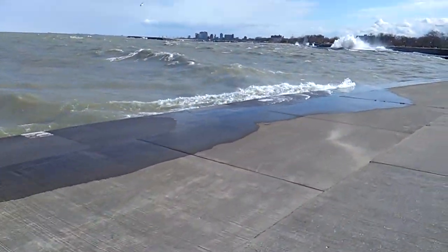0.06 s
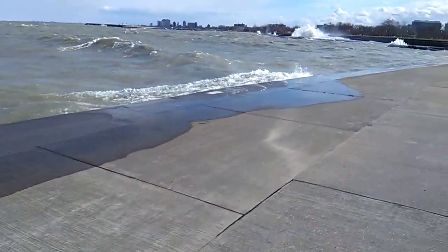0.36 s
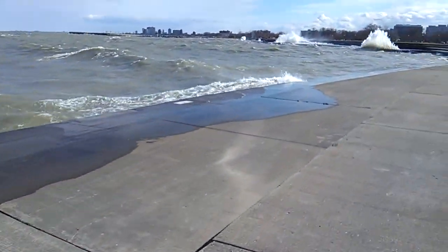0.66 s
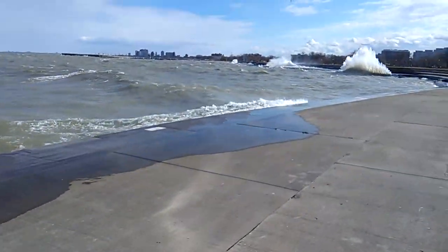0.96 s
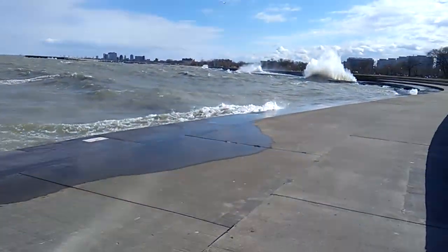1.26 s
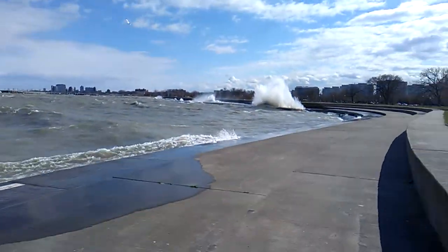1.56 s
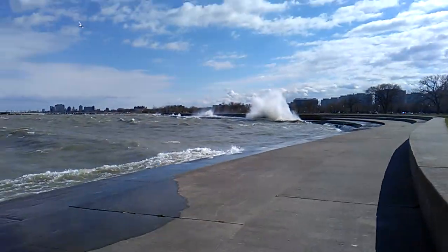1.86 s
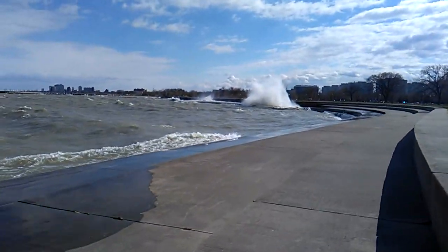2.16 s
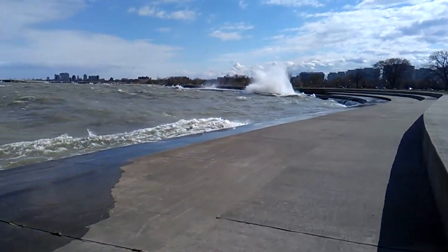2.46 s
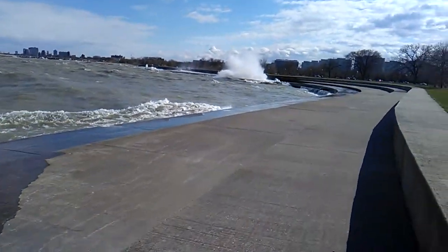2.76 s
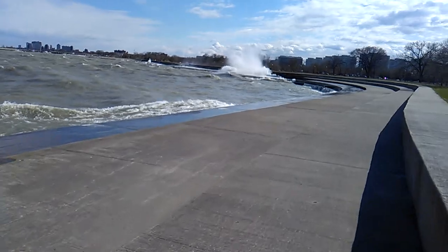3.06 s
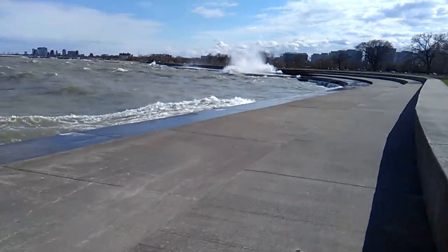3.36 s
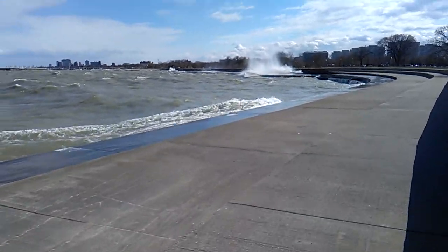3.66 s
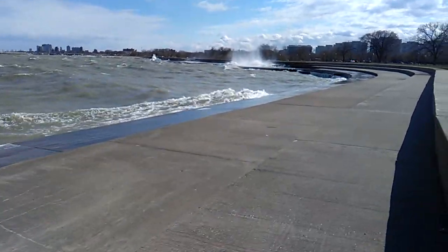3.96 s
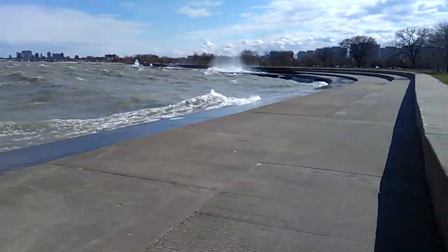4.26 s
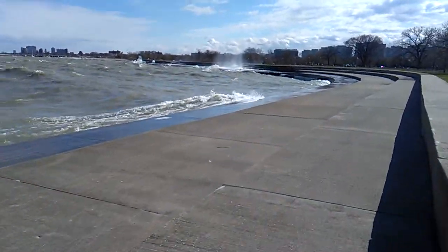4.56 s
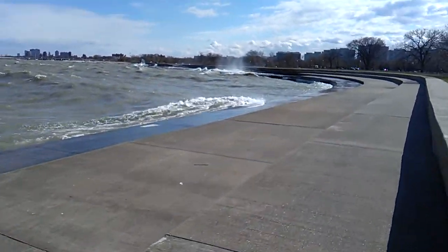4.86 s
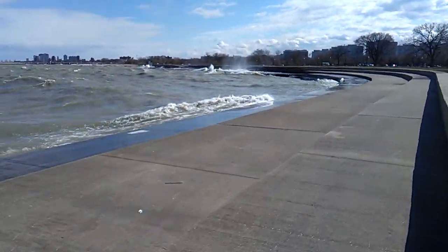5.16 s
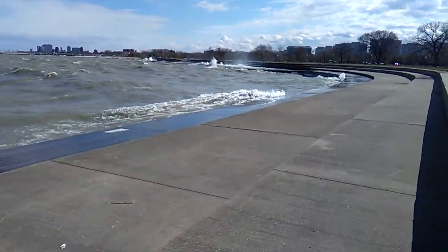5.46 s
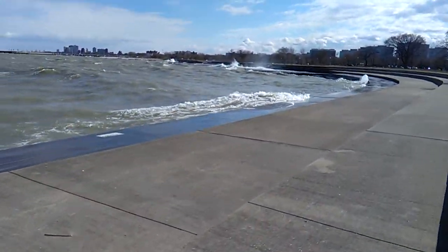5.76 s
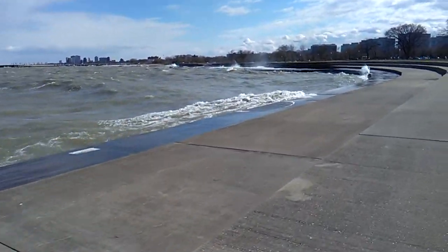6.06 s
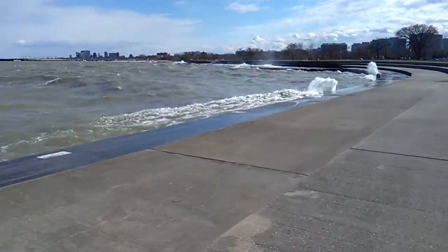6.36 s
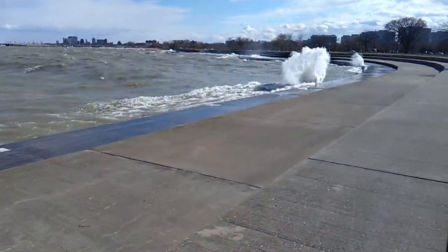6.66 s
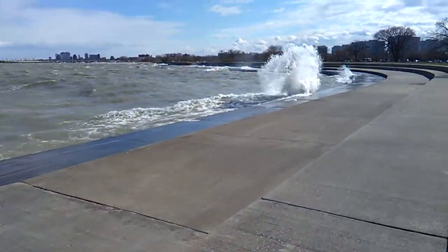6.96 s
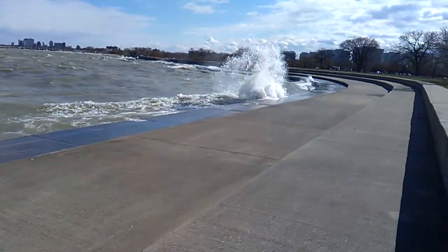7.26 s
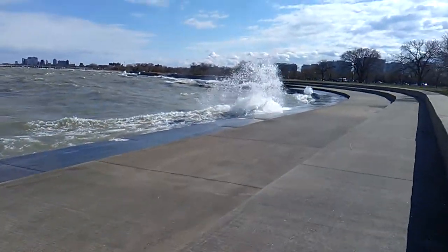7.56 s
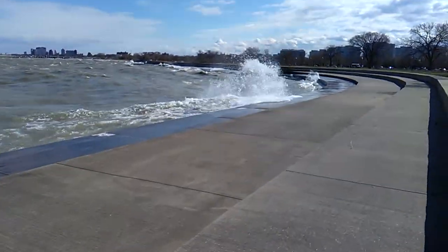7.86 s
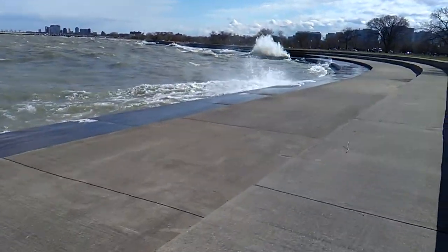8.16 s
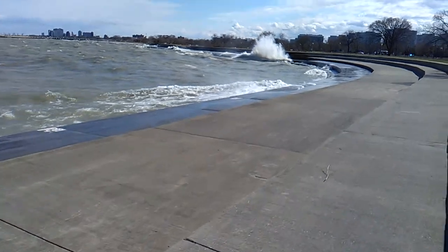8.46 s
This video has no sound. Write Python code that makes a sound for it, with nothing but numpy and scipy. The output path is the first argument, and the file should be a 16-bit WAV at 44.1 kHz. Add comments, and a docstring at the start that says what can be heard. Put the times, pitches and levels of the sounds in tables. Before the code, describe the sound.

Gusty wind buffets a hand-held microphone throughout, a low, fluttering rumble that jumps between left and right and is the loudest sound. Behind it, choppy waves roar steadily on a concrete lakeshore, sloshing and slapping down with a fine hiss. Shoes scuff and clink lightly on grit at an uneven walking pace.

The wind hits hard in the first second, eases until about 2 seconds, then builds again. A wave splashes with a brief patter of drops at 2.5 seconds. The strongest gusts come from about 3.7 to 5.3 seconds, with a few sharp pops and another splash near 4.7. From 5 seconds a big wave rolls in, bursting on the wall with a hollow thump at about 6.9. Its spray hisses and rains down in heavy drops around 8 seconds, as gusts continue to the end at about 8.6.

```python
"""Gusty wind buffets a hand-held phone, its eddies rumbling over each of two microphone ports.
Behind it, on a walk along a concrete lakeshore, choppy waves roar with clouds of bubbles, slosh up the
steps and slap down in a hiss of spray. Shoes scuff and clink on the grit. Near the end a big wave bursts
on the wall with a hollow thump of trapped air, and its spray rains down in heavy drops."""
import sys
import numpy as np
from scipy import signal
from scipy.fft import rfft, irfft, next_fast_len
from scipy.io import wavfile
from scipy.ndimage import uniform_filter1d, map_coordinates

SR = 44100
rng = np.random.default_rng(int(sys.argv[2]) if len(sys.argv) > 2 else 0)


def transcribe(u):
    """Save the signal u as a 16-bit wav file named by the first command-line argument.

    u: samples, shape (n,) or (channels, n), limited to [-1, 1]; the rate is SR.
    q: integer samples, one column per channel.
    """
    v = np.clip(np.atleast_2d(u).T, -1, 1)
    q = np.round(v * 32767).astype(np.int16)
    wavfile.write(sys.argv[1], SR, q)


N = 380141
T = np.arange(N) / SR
FFT_SIZE = next_fast_len(N + 8192)
FREQS = np.maximum(np.fft.rfftfreq(FFT_SIZE, 1 / SR), 1)

# Pan is left minus right throughout. Tone curves, all (frequency [Hz], relative level [dB]):
ROAR_EQ = [(40, 16), (150, 13.5), (300, 8.5), (470, 1.5), (610, 5), (760, 1.5), (960, 2.5), (1150, -6.5),
           (1550, -7.5), (1900, -9.5), (3000, -25), (6000, -41)]  # open surf
THUMP_EQ = [(150, 8), (350, -3.5), (520, 6.5), (800, 2), (1000, -5), (1300, -10.5), (2600, -10.5),
            (6000, -62)]  # air trapped in the big wave
SPLASH_EQ = [(700, -3), (1500, -2), (2300, 4), (2800, 5.5), (3400, 3), (4400, 1), (6000, -17), (14000, -4)]  # sheets of water on concrete
SPRAY_EQ = [(2500, -42), (3600, -20), (4400, -1.5), (5400, -3.5), (7000, 1), (10000, 0.5), (14500, 0.5)]  # fine mist
HEAVY_DROP_EQ = [(1000, -22), (2600, -13), (3400, -3), (4200, 5.5), (5500, 4.5), (7500, 0.5), (11000, -3),
                 (14500, 6)]  # thrown water landing
GRIT_EQ = [(2000, -33), (3700, 1), (4400, -4.5), (6000, 5.5), (8000, 0.5), (12000, 8.5), (14500, 7)]  # tiny hard impacts of grains or drops
EDDY_EQ = [(15, -15), (35, -16), (55, 3.5), (100, 0.5), (200, -8), (400, -22), (800, -40.5), (1600, -48.5),
           (4000, -90)]  # turbulent pressure at the usual air speed
VORTEX_EQ = [(100, -25), (230, -12), (335, 7), (450, -4), (650, -36), (1300, -61), (3000, -80)]  # vortices shed by the phone's edge

# the big wave rolls in, then bursts: (start [s], rise [s], hold [s], fall [s], level [dB])
BREAKER_SWELLS = [(4.898, 0.63, 1.529, 0.31, -39.5), (6.85, 0.12, 0.18, 0.067, -33.5)]
# first a brief, high hiss near 9 kHz as the left port's resonance widens; the other rows are sloshing
# foam: (start [s], hold [s], pitch [Hz], level [dB], pan [dB])
HISS_AND_SLOSHES = [(0.362, 0.41, 9250, -51.5, 11), (0.76, 0.061, 943, -46, 5), (1.082, 0.3, 968, -50, 3),
                    (1.19, 0.1, 2405, -52, 2), (1.58, 0.2, 976, -55, 4), (2.49, 0.12, 951, -45, -4),
                    (2.549, 0.25, 1399, -48.5, -5), (3.79, 0.2, 1148, -51, -2),
                    (2.641, 0.21, 4000, -55.5, 0), (4.058, 0.26, 1499, -48.5, -1),
                    (4.829, 0.075, 2500, -53, -3), (4.551, 0.079, 896, -50, 3), (5.06, 0.19, 819.6, -41, 4),
                    (5.78, 0.2, 950.5, -48.5, 4), (5.445, 0.19, 1651, -48, 0),
                    (5.962, 0.17, 1548, -47.5, 3), (6.301, 0.16, 1206, -48.5, -3),
                    (6.638, 0.14, 1401, -47.5, -2), (7.021, 0.17, 1250, -52, 1.5),
                    (7.529, 0.12, 1702, -51, 0), (7.72, 0.24, 920, -48, 2), (7.901, 0.17, 2600, -48, 10),
                    (7.951, 0.16, 559.6, -42, -2)]
# the bed of water washing over the steps: (time [s], splash [dB], spray [dB], spray pan [dB])
WASH_BED = [(0.0, -43, -37.5, -1), (0.33, -47.5, -41.5, -1.5), (1.03, -47, -44.5, -1.5),
            (2.02, -45.5, -42, -0.5), (2.29, -46, -44, 6), (3.2, -46, -40.5, 9), (3.56, -48, -46, 4),
            (4.61, -46, -45.5, 3), (5.46, -47.5, -44.5, -0.5), (5.93, -55, -43, -9),
            (6.32, -51.5, -47, -1.0), (6.63, -53.5, -42.5, -1.5), (7.45, -45, -35.5, 0),
            (8.36, -44.5, -35.5, 3.5), (8.61, -47, -37.5, 7)]
# waves slapping the concrete: (start [s], hold [s], splash [dB], spray [dB], spray pan [dB])
WAVE_SLAPS = [(0.647, 0.093, -46.5, -43, -2), (1.054, 0.07, -49, -55, -5.0), (1.498, 0.038, -48, -46, 1.0),
              (2.531, 0.16, -45, -41.5, 2), (2.761, 0.15, -53, -45, 4.0), (4.088, 0.21, -55, -43, 3),
              (4.707, 0.16, -41, -42, -1), (5.118, 0.11, -46, -44.5, -1), (5.496, 0.16, -53, -42.5, -1),
              (6.02, 0.11, -54, -44, 2), (6.661, 0.15, -67, -45, -6), (6.87, 0.06, -60, -35.5, -1),
              (7.05, 0.099, -56, -36.5, 0), (7.58, 0.03, -52, -39, -1)]
# thrown water falling back: (start [s], rise [s], hold [s], heavy drops [dB], splash [dB])
SHOWERS = [(2.518, 0.064, 0.055, -35.5, -44), (7.668, 0.37, 0.092, -32, -40),
           (8.07, 0.029, 0.031, -32, -46)]
# shoes on grit: (time [s], level [dB], relative ring [dB], pan [dB])
SHOE_SCUFFS = [(0.165, -27.5, -13, -8.5), (0.57, -29, -10, -2), (0.6285, -32, -20, 1),
               (0.679, -31.5, -8, -2), (0.75, -34, -5, -2), (0.9915, -30, -20, -2), (1.0456, -34, -14, -2),
               (1.114, -28, -16, -7), (1.161, -34, -13, -4), (1.3633, -36, -18, -2), (1.48, -32, -20, 3),
               (1.548, -29.5, -6.5, -2), (1.6355, -34, -9, -4), (1.9391, -35, -19, 0),
               (1.9797, -31, -28, -2), (2.0123, -37, -20, -2), (2.49, -35.5, 2, 4), (2.605, -35, -8, 3),
               (2.8035, -28, -15, -1), (2.832, -35, -18, 3), (2.906, -33, -20, 1), (3.101, -49, -18, 9),
               (3.3049, -35, -18, 2), (3.3272, -38, 0.5, 3), (4.1454, -31, -18, -1), (4.1976, -41, -5, 3),
               (4.284, -33, -11, 2), (4.7056, -34, -10, -2), (4.7328, -30.5, -21, 3), (5.1499, -31, -23, 3),
               (5.25, -31.5, -3, 4), (5.5565, -33, -14, -2), (5.642, -26, -12, -1), (6.0341, -41, 3, 1),
               (6.4113, -36, -16, -2), (6.485, -41.5, -2, 0), (6.8285, -40, -18, -4), (7.055, -36, -4, 2),
               (8.3559, -27, -14, 0)]
# the bed of wind between gusts: (time [s], level [dB], pan [dB])
BREEZE_BED = [(0.0, -33, -3), (0.65, -31, 0), (1.1, -30, -1), (1.31, -40, 2), (1.54, -29, 1),
              (1.92, -37, -1), (2.05, -27, 2), (2.55, -28, 4), (2.7, -23, 1), (2.84, -28, 2.5),
              (3.1, -19, 0), (3.42, -23.5, 0), (3.62, -22, 1), (4.1, -15, 1), (4.19, -20, 3),
              (5.18, -18.5, -1), (5.37, -28, 3), (5.58, -33, 1), (6.34, -30, -3), (7.3, -19.5, -2),
              (7.75, -31.5, -7.5), (7.87, -33, -6.5), (8.14, -20.5, 1.5), (8.62, -21, 5.5)]
# gusts on the ports: (centre [s], length [s], level [dB], pan [dB], small-eddy share over the usual [dB])
GUST_HITS = [(0.121, 0.041, -21, -16, 1), (0.184, 0.046, -14.5, 7, -2), (0.248, 0.079, -10.5, -10, -2.5),
             (0.312, 0.064, -14, -17, 5), (0.399, 0.08, -13.5, -12, 0), (0.607, 0.032, -21.5, -14, 8.5),
             (0.658, 0.03, -20.5, 8, 0), (0.71, 0.037, -16.5, -4, 0), (0.808, 0.025, -16.5, -16, -5),
             (0.863, 0.051, -18, -15, -4), (0.991, 0.042, -25, 1, -2), (1.079, 0.043, -22, -9, -4),
             (1.448, 0.038, -24.5, -11, -2), (2.019, 0.046, -22.5, -12, 2), (2.067, 0.023, -20, 3.5, -2),
             (2.141, 0.06, -12, 4, -3), (2.211, 0.049, -20, 4, 0), (2.322, 0.04, -19.5, 13, 0),
             (2.371, 0.03, -22, 9, -2), (2.464, 0.052, -15.5, -13, -7), (2.616, 0.043, -15, -12, -3),
             (2.778, 0.051, -11, -18, -7.5), (2.867, 0.026, -11.5, -15.5, -7), (2.92, 0.041, -19, -4.5, -1),
             (2.973, 0.029, -16.5, 6, -1), (3.03, 0.051, -15, 1, -1.5), (3.099, 0.083, -11.5, -1, -2),
             (3.197, 0.052, -15, 2.5, -2), (3.246, 0.023, -17, 1, -1), (3.482, 0.039, -12.5, -14, -6),
             (3.573, 0.052, -11.5, -3.5, -5), (3.656, 0.043, -17, -12.5, -3), (3.755, 0.095, -9, -13, -1),
             (3.862, 0.083, -11, -7, 5.5), (4.002, 0.14, -12, 3, 4), (4.226, 0.051, -15, 4, 0),
             (4.359, 0.052, -15, 10, 0), (4.416, 0.035, -15, -8.5, -1), (4.509, 0.096, -10.5, -3, 0),
             (4.575, 0.03048, -14, 0, 1), (4.625, 0.043, -8.5, 3.5, 0), (4.691, 0.03, -15.5, -2, 2),
             (4.749, 0.079, -14, 3, 0), (4.814, 0.037, -11, -9, 5), (4.89, 0.031, -17, -10.5, -3),
             (4.96, 0.04, -15.5, 1, -1), (5.064, 0.085, -8, -1, 0.5), (5.152, 0.069, -10.5, -3, 1.5),
             (5.25, 0.052, -19, 6, 2), (5.414, 0.028, -18.5, -12.5, -2), (5.692, 0.029, -22.5, 5, -3),
             (5.78, 0.071, -19.5, 2.5, -4), (5.906, 0.041, -22, -13, -2.5), (6.011, 0.039, -14, -17, -1),
             (6.08, 0.063, -14.5, -20, 6), (6.14, 0.046, -14, -5, -1), (6.211, 0.044, -20, 3, -2),
             (6.308, 0.038, -21.5, -13.5, -4), (6.391, 0.031, -19, -12, -0.5), (6.465, 0.028, -19, -9, -4),
             (6.565, 0.044, -19, -9.5, -3), (6.659, 0.098, -12, -1, -3), (6.752, 0.03, -19, -10, -3),
             (6.867, 0.11, -15.5, -11, -4), (7.161, 0.075, -13.5, 0, 1), (7.248, 0.041, -12, 1.5, -0.5),
             (7.328, 0.071, -14, -1, -2), (7.426, 0.037, -12, -11, -5), (7.483, 0.036, -15.5, -5.5, -7),
             (7.551, 0.033, -18, -16.5, -7), (7.609, 0.047, -23.5, -7, -4),
             (7.809, 0.032, -23.5, -14.5, -0.5), (7.957, 0.076, -16, -3, -7), (8.082, 0.05, -10.5, 6.5, -6),
             (8.16, 0.051, -14, -4.5, -3.5), (8.246, 0.099, -10, 4.5, -0.5), (8.383, 0.035, -19.5, 7, -2),
             (8.48, 0.072, -21, 7, -7.5), (8.54, 0.03, -16.5, -2, -8.5), (8.604, 0.043, -16.5, -2.5, 5)]
# eddies tearing off a port in the hardest gusts: (time [s], level [dB], pan [dB])
EDDY_SNAPS = [(3.835, -10, -6), (3.875, -8, -11), (3.961, -7, 17), (3.995, -8, -13), (4.029, -8, 2),
              (4.632, -12, 7), (5.062, -9, 5), (5.189, -12, 5), (5.272, -18, 3)]
# the air in each port, left then right: (resonance [Hz], width [Hz], boost [dB], roll-off corner [Hz])
PORT_TONES = [(7890, 1020, 13, 13400), (7550, 1110, 14, 8850)]


def undb(db):
    """Decibels to gain."""
    return 10 ** (np.asarray(db) / 20)


def automation(table):
    """The columns of a timed table as curves, sample by sample."""
    times, *columns = np.transpose(table)
    return [np.interp(T, times, column) for column in columns]


def shape(x, gain):
    """Filter by a gain for every frequency."""
    return irfft(rfft(x, FFT_SIZE) * gain, FFT_SIZE)[..., :N]


def colour(x, eq):
    """Filter by a tone curve and bring to rms 1."""
    hz, db = np.transpose(eq)
    y = shape(x, undb(np.interp(np.log(FREQS), np.log(hz), db)))
    return y / y.std()


def drift(rate):
    """A random modulator with a spread of about 1 that glides to `rate` new values a second."""
    knots = rng.standard_normal(4096)
    return 1.2 * np.interp(T * rate + rng.random(), np.arange(len(knots)), knots)


def panned(pan_db):
    """Constant-power left and right gains for a fixed or moving pan."""
    gains = undb(np.vstack([pan_db, -pan_db]) / 2)
    return gains / np.sqrt(np.mean(gains ** 2, axis=0))


def swell(start_s, rise_s, hold_s, fall_s):
    """An envelope: smooth rise, hold, exponential fall."""
    rise = np.sin(np.pi / 2 * np.clip((T - start_s) / rise_s, 0, 1)) ** 2
    return rise * np.exp(-np.maximum(T - start_s - rise_s - hold_s, 0) / fall_s)


def diffuse(pair, port_gap_m=0.19):
    """Sound from all along the shore: lows reach both ports alike, highs unrelated."""
    alike = np.sinc(2 * FREQS * port_gap_m / 343)
    mid, side = shape(pair[0], np.sqrt(1 + alike)), shape(pair[1], np.sqrt(1 - alike))
    return np.array([mid + side, mid - side])


def impacts(rate, spread_db):
    """Two streams of tiny clicks of random size, `rate` a second each."""
    sizes = undb(spread_db * np.minimum(rng.exponential(size=(2, N)), 5))
    hits = (rng.random((2, N)) < rate / SR) * sizes * rng.choice([-1, 1], (2, N))
    return hits / hits.std()


def patter(rate, spread_db, decay_s):
    """Each drop or popping bubble shatters into a very short burst of hiss."""
    power = signal.lfilter([1], [1, -np.exp(-2 / (decay_s * SR))], impacts(rate, spread_db) ** 2)
    return np.sqrt(power) * rng.standard_normal((2, N))


def churn(x, rate, depth_db, count=6):
    """Bubbles and drops come in clouds of one size: each band swells and sinks on its own."""
    band_index = np.interp(np.log(FREQS), np.log([400, 6000]), [0, count - 1])
    bands = (shape(x, np.maximum(1 - abs(band_index - k), 0)) for k in range(count))
    y = sum(band * undb(depth_db * drift(rate)) for band in bands)
    return y / y.std()


def landing_water():
    """Gains of splash, spray and heavy drops: waves, plume and showers add their power to the wash."""
    splash_db, spray_db, pan_db = automation(WASH_BED)
    splash, spray, heavy = undb(splash_db) ** 2, (undb(spray_db) * panned(pan_db)) ** 2, 0
    for start_s, hold_s, splash_db, spray_db, pan_db in WAVE_SLAPS:
        wave = swell(start_s, rise_s=0.067, hold_s=hold_s, fall_s=0.058)
        splash += (wave * undb(splash_db)) ** 2
        spray += (wave * undb(spray_db) * panned(pan_db)) ** 2
    plume = swell(start_s=7.054, rise_s=0.59, hold_s=0.51, fall_s=0.05)  # the big wave's windblown spray
    spray += (undb(-36.5) * plume) ** 2
    for start_s, rise_s, hold_s, heavy_db, splash_db in SHOWERS:
        shower = swell(start_s, rise_s, hold_s, fall_s=0.056)
        heavy += (shower * undb(heavy_db)) ** 2
        splash += (shower * undb(splash_db)) ** 2
    return np.sqrt(splash), np.sqrt(spray), np.sqrt(heavy)


def surf(splash_gain, bed_db=-33.5, follow_db=4.5):
    """Bubble clouds roar, more as water lands; air trapped in the big wave adds a hollow body."""
    roar = colour(diffuse(rng.standard_normal((2, N))), ROAR_EQ)
    roar = churn(roar, rate=26, depth_db=1.5)
    roar *= np.hypot(undb(bed_db + 1.1 * drift(10)), undb(follow_db) * splash_gain)
    breaker = np.sqrt(sum((undb(db) * swell(*timing)) ** 2 for *timing, db in BREAKER_SWELLS))
    thump = colour(diffuse(rng.standard_normal((2, N))), THUMP_EQ)
    thump *= breaker * undb(0.96 * drift(28))
    return (roar + thump) * panned(1.5)


def hiss_and_sloshes(wobble_octaves=0.11, flutter_db=2.5, climb_octaves_per_s=0.5, relative_width=0.29):
    """Noise bands that wobble and climb: one high hiss at the left port, then sloshes of ringing foam."""
    out = np.zeros((2, N))
    rise_s, fall_s = 0.06, 0.041
    wobble, flutter = wobble_octaves * drift(22), undb(flutter_db * drift(40))
    for start_s, hold_s, hz, db, pan_db in HISS_AND_SLOSHES:
        centre_s = start_s + rise_s + hold_s / 2
        octaves = climb_octaves_per_s * np.clip(T - centre_s, -.5, .5) + wobble
        phase = 2 * np.pi * np.cumsum(hz * 2 ** octaves) / SR
        lowpass = signal.butter(2, hz * relative_width / 2, fs=SR, output="sos")
        slow_noise = signal.sosfilt(lowpass, rng.standard_normal((2, 2, N)))
        band = slow_noise[0] * np.cos(phase) + slow_noise[1] * np.sin(phase)
        out += band / band.std() * undb(db) * swell(start_s, rise_s, hold_s, fall_s) * panned(pan_db)
    return out * flutter


def chirps(splash_gain, count=900, low_hz=1007, high_hz=3123, decay_cycles=27, glide=0.0275):
    """Faint, short rising tones at 1-3 kHz, louder where more water lands."""
    out = np.zeros((2, N + SR))
    for when, pitch, size, side, lag in rng.random((count, 5)):
        hz = low_hz * (high_hz / low_hz) ** pitch
        cycles = np.arange(int(5 * decay_cycles * SR / hz)) * hz / SR
        envelope = np.exp(-cycles / decay_cycles) * (1 - np.exp(-cycles / 2))
        phase = 2 * np.pi * (cycles * (1 + glide * cycles / decay_cycles / 2) + np.array([[0], [lag]]))
        strength = undb(1.5 * min(-np.log(size), 4))
        start = int(when * N)
        out[:, start:start + len(cycles)] += strength * envelope * np.sin(phase) * panned(6 * side)
    return out[:, :N] / out[:, :N].std() * splash_gain * undb(-8)


def wash(splash_gain, spray_gain, lapping_db=0.4):
    """Sheets of water slap on the concrete; fine spray hisses and single drops crackle in it."""
    splash = colour(diffuse(impacts(rate=14000, spread_db=1.5)), SPLASH_EQ)
    splash = churn(splash, rate=49, depth_db=2.5) * splash_gain * panned(3.2)
    mist = colour(diffuse(impacts(rate=26000, spread_db=-0.5)), SPRAY_EQ) * undb(drift(70))
    crackle = colour(patter(rate=450, spread_db=3.2, decay_s=0.001), GRIT_EQ)
    crackle *= undb(-7 + 2.194 * drift(70))
    return (splash + (mist + crackle) * spray_gain) * undb(lapping_db * drift(22))


def downpour(heavy_gain):
    """Thrown water comes down in clumps of heavy drops; the largest smack one by one."""
    rain = colour(impacts(rate=5200, spread_db=-0.5), HEAVY_DROP_EQ) * undb(0.83 * drift(66))
    smacks = colour(patter(rate=300, spread_db=4.0, decay_s=0.0012), HEAVY_DROP_EQ)
    return undb(-3.5) * (rain + smacks) * heavy_gain * panned(4)


def scuffs(rise_s=0.0006, decay_s=0.0045, slide_s=0.035, slide_db=-11, ring_hz=4400, ring_s=0.0077):
    """A sole bites on the grit and slides on; larger grains clink, each slightly detuned."""
    scrape, ring = np.zeros((2, N)), np.zeros((2, N))
    for start_s, db, ring_db, pan_db in SHOE_SCUFFS:
        detune, lag = rng.standard_normal(2)
        span = slice(int(start_s * SR), int(start_s * SR) + SR // 5)
        age = np.maximum(T[span] - start_s, 0)
        bite = undb(db) * (1 - np.exp(-age / rise_s)) * panned(pan_db)
        scrape[:, span] += bite * (np.exp(-age / decay_s) + undb(slide_db) * np.exp(-age / slide_s))
        clink = np.sin(2 * np.pi * ring_hz * (1 + 0.013 * detune) * age + np.array([[0], [lag]]))
        ring[:, span] += bite * undb(ring_db + 1.5) * np.exp(-age / ring_s) * clink
    scrape += undb(-51 + 3.5 * drift(38))  # loose grains crunch faintly between the bites
    grains = colour(impacts(rate=3900, spread_db=1.5), GRIT_EQ)
    return undb(-1.5) * scrape * grains + ring


def snaps(edge_s=0.00047, relax_s=0.0016):
    """An eddy tears off a port: the pressure flips in one steep step and relaxes at once."""
    out = np.zeros((2, N))
    for time_s, db, pan_db in EDDY_SNAPS:
        span = slice(int(time_s * SR) - SR // 50, int(time_s * SR) + SR // 50)
        age = T[span] - time_s
        out[:, span] += undb(db) * np.tanh(age / edge_s) * np.exp(-abs(age) / relax_s) * panned(pan_db)
    return out


def airflow(wander_db=1.69, breeze_small_db=-4.5, gust_steepness=6):
    """Strength and small-eddy share at each port: gusts add their power to a wandering breeze."""
    breeze_db, breeze_pan_db = automation(BREEZE_BED)
    wander = np.array([drift(18) for _ in range(2)])
    power = (undb(breeze_db + wander_db * wander) * panned(breeze_pan_db)) ** 2
    small_eddies = power * undb(breeze_small_db)
    for centre_s, length_s, db, pan_db, small_db in GUST_HITS:
        span = slice(max(int((centre_s - 2 * length_s) * SR), 0), int((centre_s + 2 * length_s) * SR))
        off_centre = abs(2 * (T[span] - centre_s) / length_s)
        gust = (undb(db) * panned(pan_db)) ** 2 / (1 + off_centre ** gust_steepness)
        power[:, span] += gust
        small_eddies[:, span] += gust * undb(small_db)
    return np.sqrt(power), small_eddies / power


def buffet(speed, flutter_db=2.5, low_hz=44, high_hz=840):
    """Turbulence sweeps over one port: each surge makes the pressure both stronger and quicker."""
    surge = undb(flutter_db * drift(130))
    travel = np.cumsum(speed * surge ** .35)
    field = colour(rng.standard_normal(N), EDDY_EQ)
    pressure = surge * map_coordinates(field, [travel], order=1, mode="mirror")
    # slow swells leak away and tiny eddies average out
    pressure = signal.sosfilt(signal.butter(4, low_hz, "high", fs=SR, output="sos"), pressure)
    pressure = signal.sosfilt(signal.butter(2, high_hz, fs=SR, output="sos"), pressure)
    power = uniform_filter1d(uniform_filter1d(pressure ** 2, size=2400), size=2400)
    return pressure / np.sqrt(power + 1e-12)  # levelled, so the airflow alone sets the strength


def wind(shedding=0.31):
    """Each port has its own eddies: faster air brings more small ones, then starts to shed vortices."""
    strength, small_share = airflow()
    small_share *= np.minimum(strength / undb(-24), 1) ** .6  # light air holds hardly any
    eddies = np.array([buffet(speed) for speed in small_share ** .45])
    vortices = colour(rng.standard_normal((2, N)), VORTEX_EQ) * undb(2.6 * drift(110))
    return strength * (eddies + vortices * shedding * np.clip(small_share - 1, 0, 3))


def scene():
    """The mix at the two ports: the shore behind, wind in front, shoes underfoot."""
    splash, spray, heavy = landing_water()
    backdrop = surf(splash) + hiss_and_sloshes() + chirps(splash) + wash(splash, spray) + downpour(heavy)
    return backdrop + wind() + snaps() + scuffs()


def record(dry, shadow_hz=3480, shadow_width_hz=400, shadow_depth=0.11, low_hz=37, top_hz=14380):
    """The phone's body shades one band, each port resonates, and the deep bass and the top are cut."""
    shadow = 1 - shadow_depth * np.exp(-((FREQS - shadow_hz) / shadow_width_hz) ** 2)
    out = []
    for x, (hz, width_hz, boost_db, corner_hz) in zip(dry, PORT_TONES):
        resonance = 1 / (1 + ((FREQS ** 2 - hz ** 2) / (FREQS * width_hz)) ** 2)
        roll_off = 1 + (FREQS / corner_hz) ** 6
        gain = shadow * np.sqrt((1 + undb(boost_db) ** 2 * resonance) / roll_off)
        out.append(shape(np.pad(x, (0, FFT_SIZE - N), "linear_ramp"), gain))
    out = signal.sosfilt(signal.butter(5, low_hz, "high", fs=SR, output="sos"), out)
    saturated = 1.05 * np.tanh(out / 1.05)  # the hardest buffets overload softly
    return signal.sosfilt(signal.ellip(12, .1, 80, top_hz, fs=SR, output="sos"), saturated)


dry = scene()
out = record(dry)
transcribe(out)
```